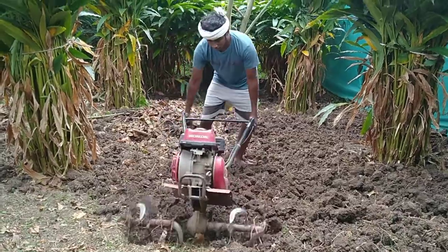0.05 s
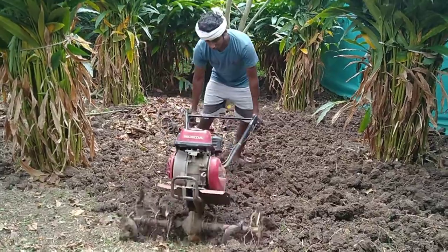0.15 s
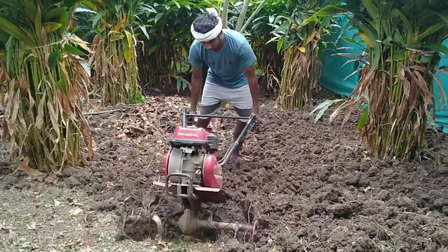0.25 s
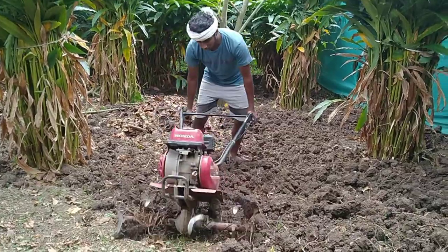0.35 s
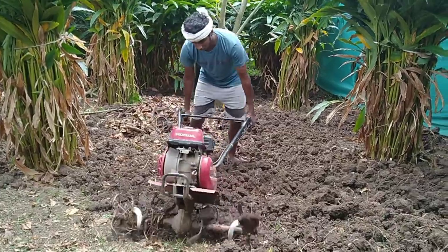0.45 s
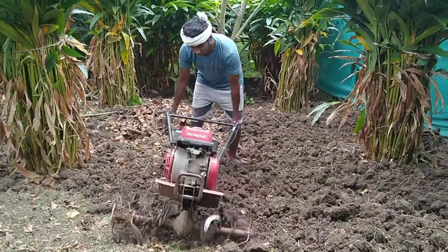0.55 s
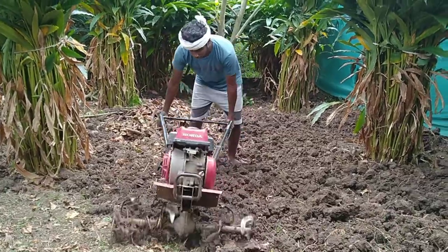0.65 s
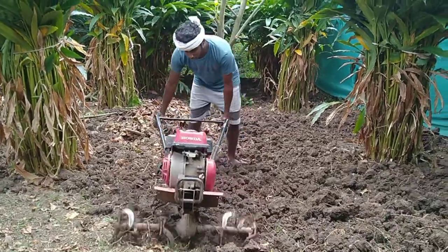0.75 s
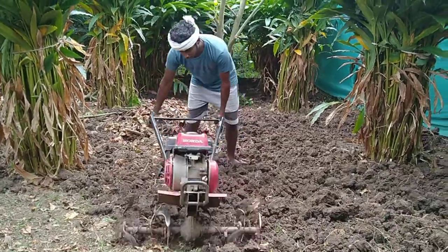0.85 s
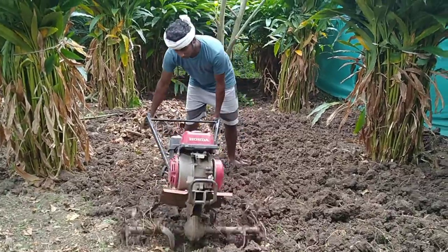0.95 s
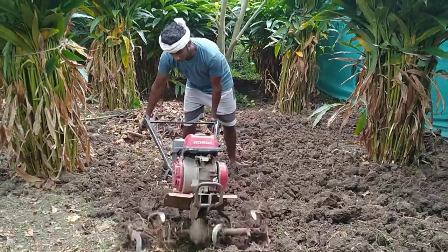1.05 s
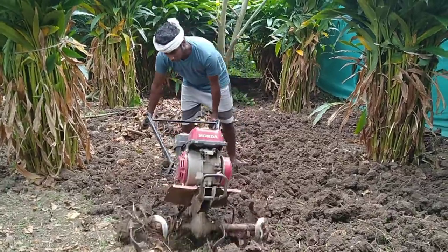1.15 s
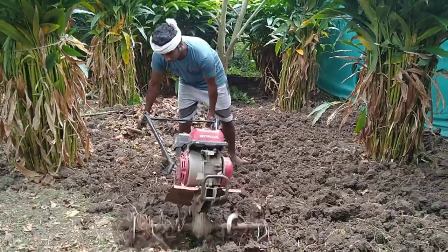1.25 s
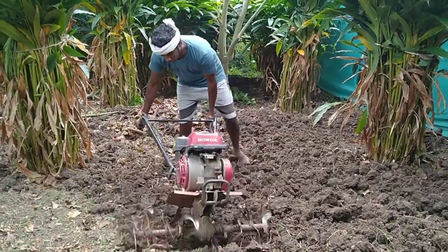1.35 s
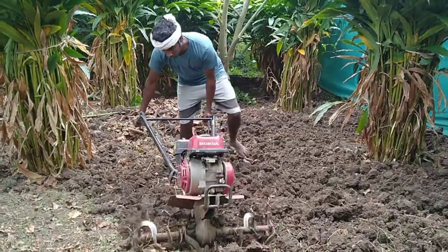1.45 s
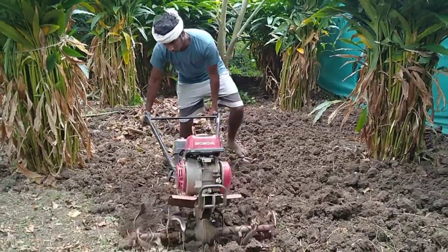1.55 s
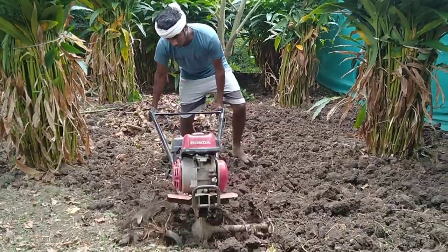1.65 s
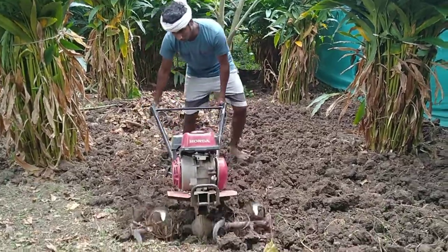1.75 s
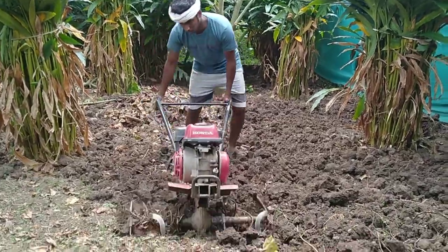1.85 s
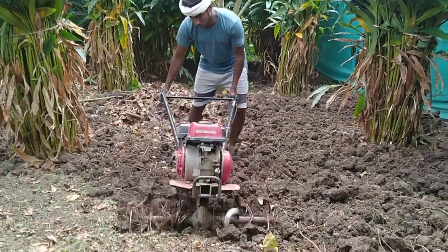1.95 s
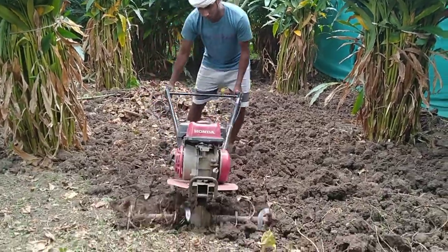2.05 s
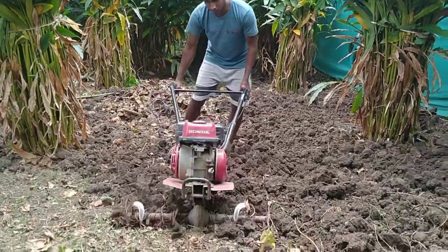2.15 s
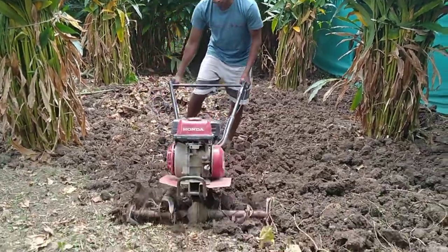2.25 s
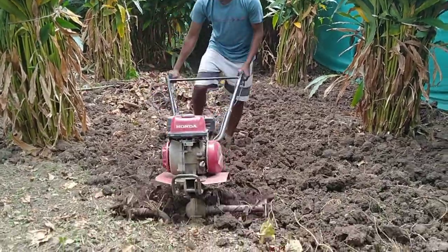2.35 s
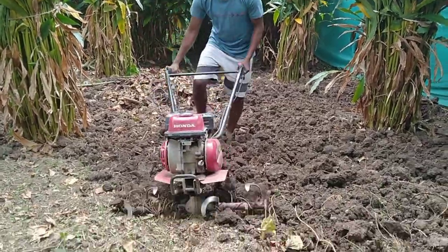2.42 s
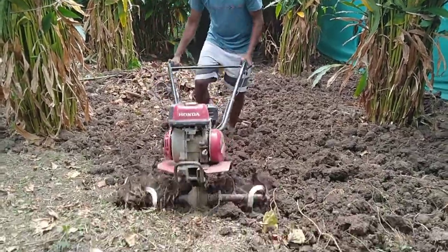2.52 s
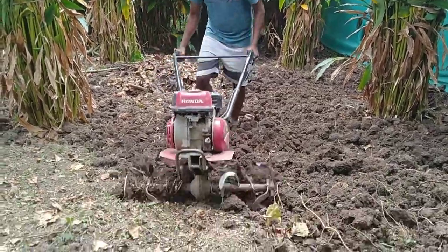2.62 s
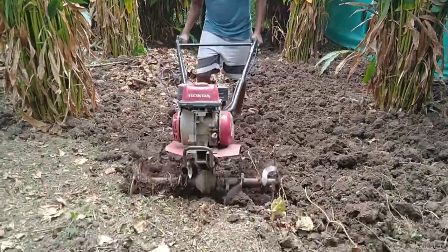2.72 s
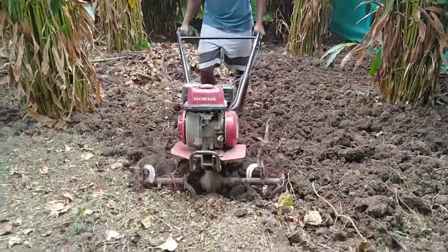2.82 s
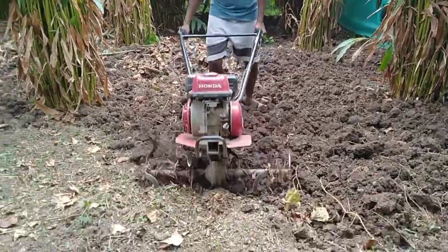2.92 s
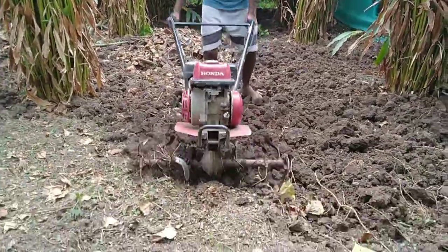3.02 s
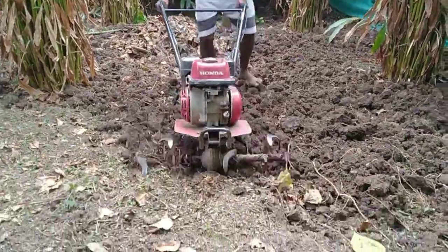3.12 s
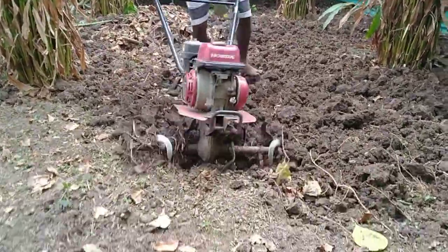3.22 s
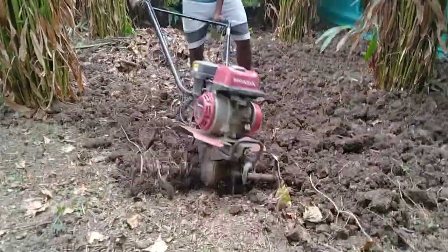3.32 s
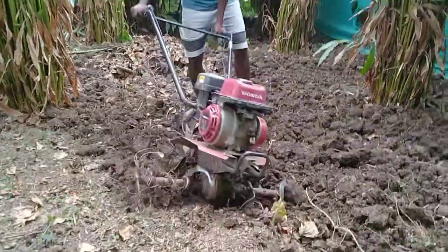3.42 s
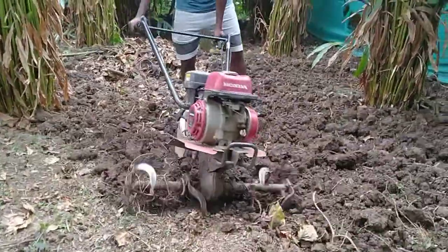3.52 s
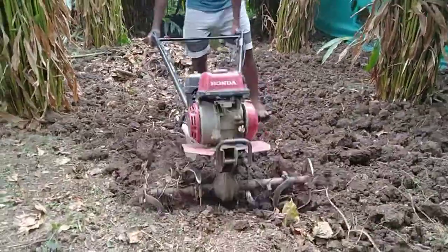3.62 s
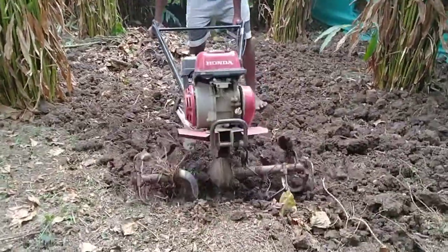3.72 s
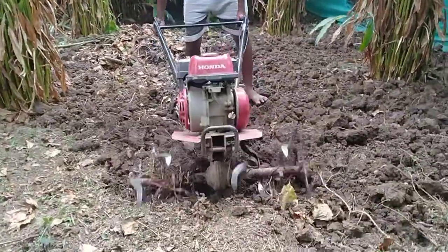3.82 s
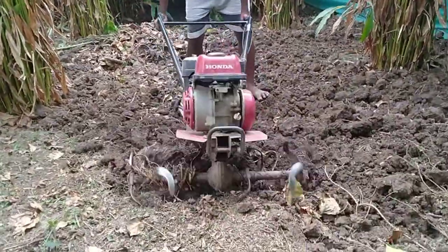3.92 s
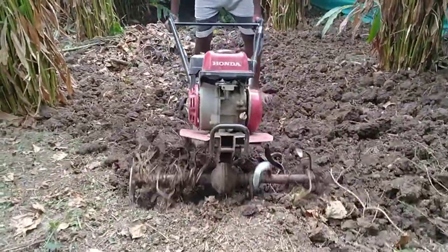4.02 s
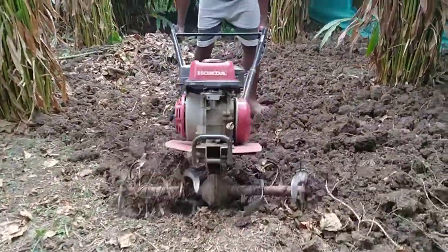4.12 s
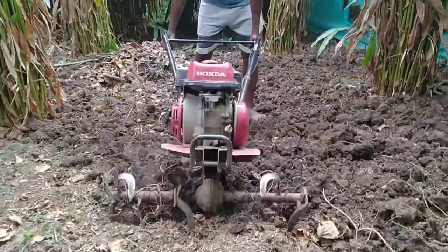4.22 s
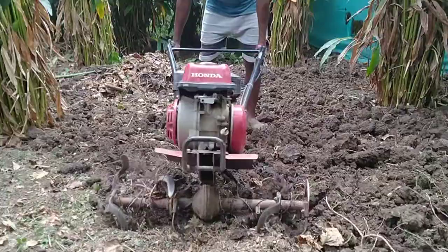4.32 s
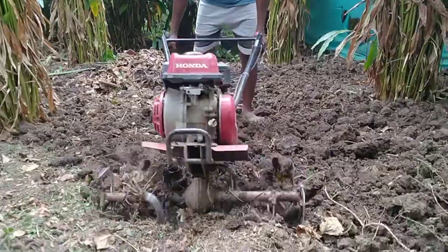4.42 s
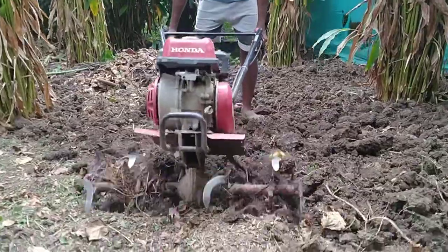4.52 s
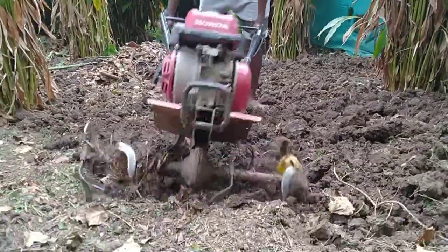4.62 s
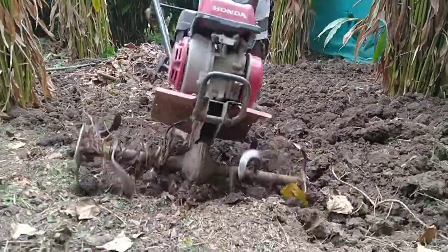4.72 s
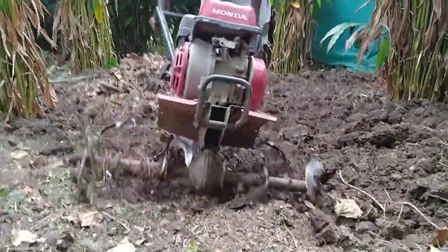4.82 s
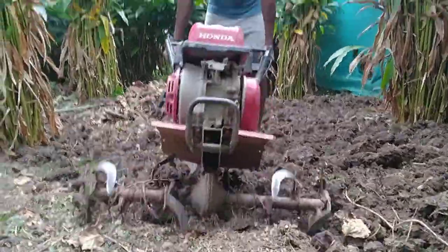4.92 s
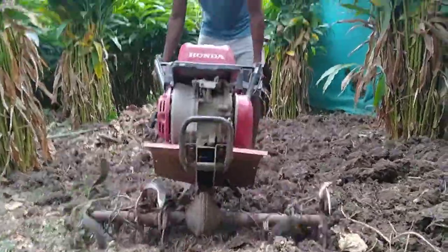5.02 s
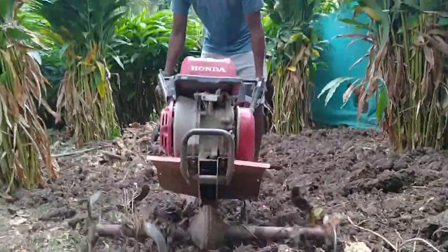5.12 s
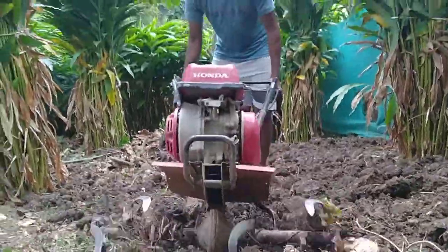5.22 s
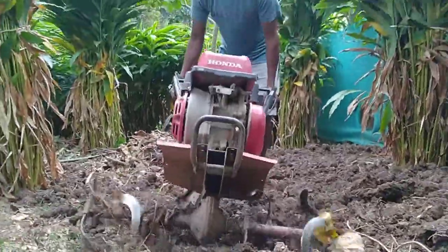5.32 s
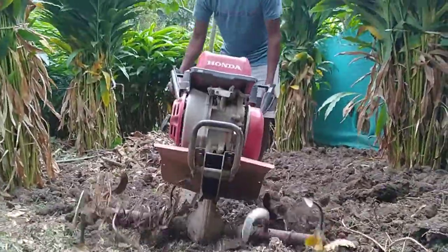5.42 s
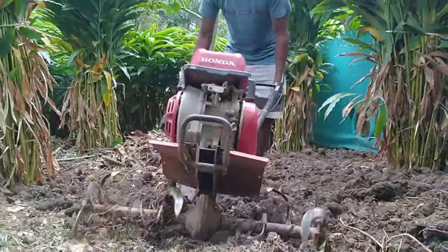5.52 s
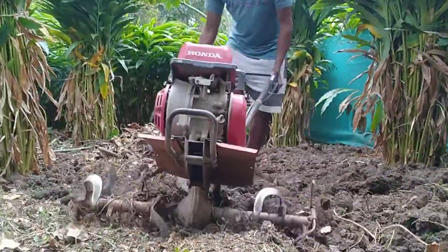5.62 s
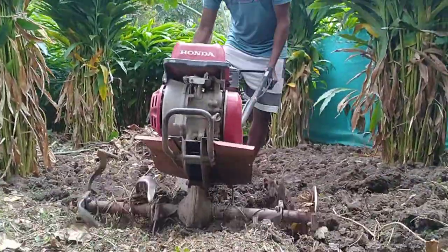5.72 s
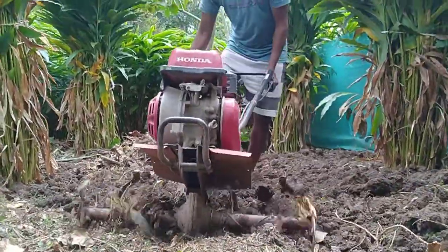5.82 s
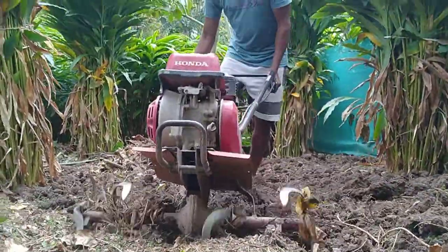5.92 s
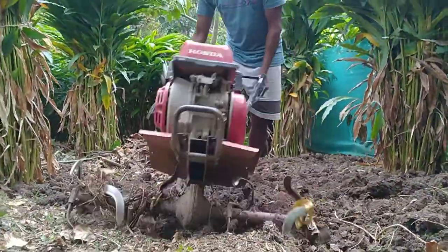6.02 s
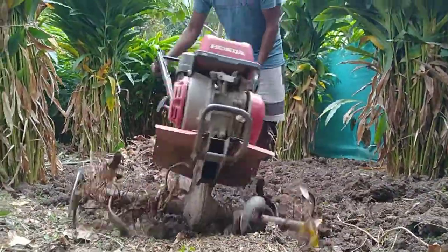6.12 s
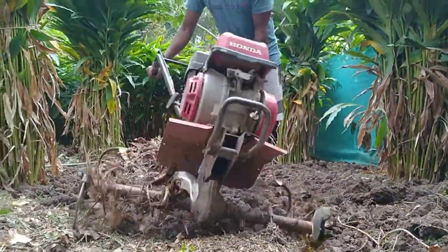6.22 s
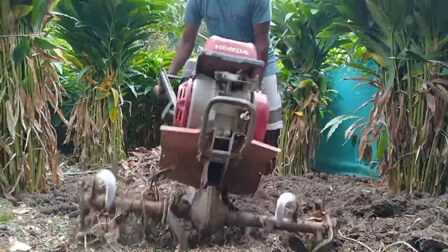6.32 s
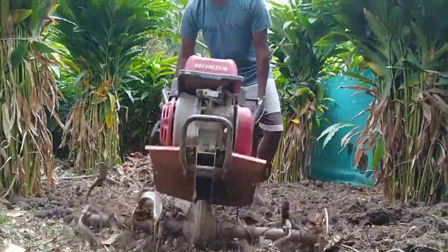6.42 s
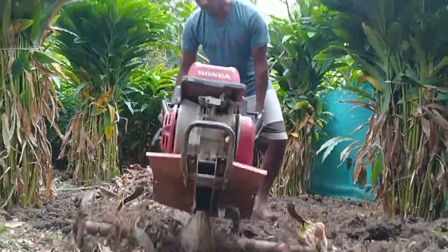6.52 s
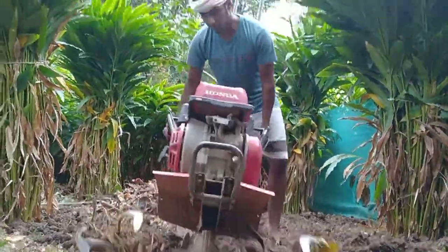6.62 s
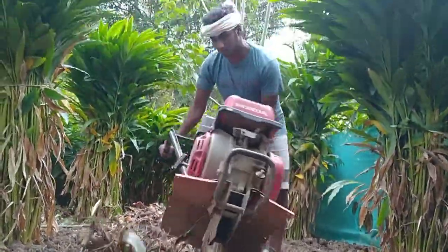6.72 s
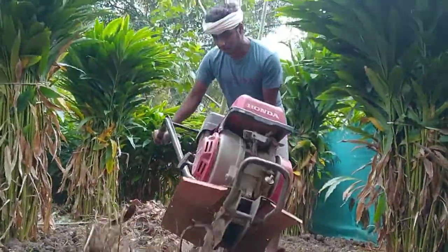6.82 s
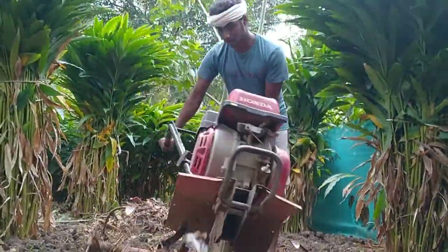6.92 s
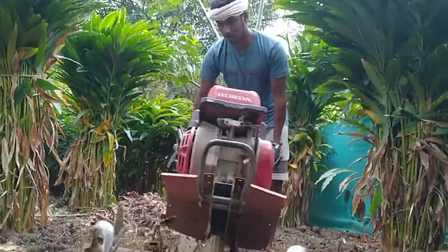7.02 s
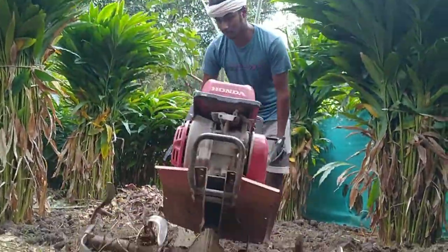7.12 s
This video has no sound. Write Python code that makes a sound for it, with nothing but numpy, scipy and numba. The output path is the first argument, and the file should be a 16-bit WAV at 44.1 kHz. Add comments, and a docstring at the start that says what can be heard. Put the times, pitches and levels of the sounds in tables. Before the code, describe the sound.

A small petrol tiller chugs and ticks steadily, working closer as its tines scrape and crumble through soil.

```python
"""Petrol tiller in a garden plot

A small four-stroke tiller digs through soil and works its way closer; one cycle count drives all engine sounds.
Each cycle gives gas puffs, exhaust bark, intake gulp and bright valve tick; casing, guard plate and cover ring.
Tines scrape and crumble the soil (filtered grains); each bite slows the engine. Twice the machine
thumps onto the ground (decaying sines). Faint low noise is the open air."""
import sys
import numpy as np
from scipy import signal
from scipy.fft import rfft, irfft, next_fast_len
from scipy.io import wavfile
from scipy.ndimage import uniform_filter1d
from numba import njit

SR = 44100
rng = np.random.default_rng(int(sys.argv[2]) if len(sys.argv) > 2 else 0)


def dump(signal):
    """Clip the signal to [-1, 1] and save it as 16-bit WAV at the path in sys.argv[1]."""
    limited = np.clip(np.atleast_2d(signal).T, -1, 1)
    pcm = np.round(limited * 32767).astype(np.int16)
    wavfile.write(sys.argv[1], SR, pcm)


N = 315315
TIME = np.arange(N) / SR
# valve openings, in cycles
EXHAUST_AT, INTAKE_AT = .02, .274


def from_db(db):
    """Decibels to gain."""
    return 10 ** (np.asarray(db) / 20)


def rms_one(x):
    """Scale to unit rms."""
    return x / np.sqrt(np.mean(x ** 2) + 1e-20)


def in_time(rows):
    """Interpolate each column over time; the first column is seconds."""
    s, *columns = np.transpose(rows)
    return [np.interp(TIME, s, c) for c in columns]


def drift(per_s):
    """Random wander with a spread of about 1, per_s new points a second."""
    return np.interp(TIME * per_s, np.arange(200), rng.standard_normal(size=200))


def swell(at_s, half_length_s):
    """Gaussian rise and fall around a moment."""
    return np.exp(-((TIME - at_s) / half_length_s) ** 2)


def colour(x, spectrum):
    """Shape a sound with a smooth spectrum; rms 1."""
    hz, db = np.transpose(spectrum)
    size = next_fast_len(N + 4096)
    bins_hz = np.maximum(np.fft.rfftfreq(size, 1 / SR), 1)
    gain = from_db(np.interp(np.log(bins_hz), np.log(hz), db))
    return rms_one(irfft(rfft(x, size) * gain, size)[:N])


def resonate(x, hz, width_hz):
    """Two-pole resonance with gain 1 at its top."""
    r = np.exp(-np.pi * width_hz / SR)
    zeros = np.array([1, 0, -1]) * (1 - r * r) / 2
    poles = [1, -2 * r * np.cos(2 * np.pi * hz / SR), r * r]
    return signal.lfilter(zeros, poles, x + 1e-18)


@njit
def moving_resonance(x, hz, width_hz):
    """Two-pole resonance with gain 1 at its top, whose centre follows a curve."""
    r = np.exp(-np.pi * width_hz / SR)
    y = np.zeros(len(x))
    for i in range(2, len(x)):
        drive = (1 - r * r) / 2 * (x[i] - x[i - 2])
        y[i] = drive + 2 * r * np.cos(2 * np.pi * hz[i] / SR) * y[i - 1] - r * r * y[i - 2] + 1e-18
    return y


def grains(per_s, spread_db):
    """Random tiny impacts of uneven size and either sign; rms 1."""
    sizes = from_db(spread_db * np.minimum(rng.exponential(1, N), 4))
    hits = rng.random(N) < per_s / SR
    return rms_one(hits * sizes * rng.choice([-1, 1], N))


def each_cycle(turn, spread_db):
    """A new random gain for every engine cycle."""
    return from_db(spread_db * rng.standard_normal(size=400))[np.floor(turn).astype(int)]


def knock(cycle, at, spread_db):
    """One click per cycle, at a point given in cycles."""
    turn = cycle - at
    clicks = np.diff(np.floor(turn), prepend=np.floor(turn[0]))
    return clicks * each_cycle(turn, spread_db)


def burst(cycle, at, rise, decay, spread_db):
    """Envelope that rises fast once per cycle and dies away (times in cycles)."""
    age = (cycle - at) % 1
    return (1 - np.exp(-age / rise)) * np.exp(-age / decay) * each_cycle(cycle - at, spread_db)


def engine_sag():
    """Firings per second lost as the tines bite and drag the engine down."""
    # Each row: centre in seconds, half length in seconds, firings per second lost.
    bites = [(0.079, 0.101, 1.312), (0.291, 0.091, 1.651), (0.619, 0.146, 2.747), (1.048, 0.154, 1.846),
             (1.223, 0.089, 2.264), (1.391, 0.09, 2.0), (1.616, 0.184, 1.94), (1.935, 0.091, 2.975),
             (2.096, 0.081, 2.581), (2.293, 0.143, 2.103), (2.632, 0.137, 2.685), (2.986, 0.103, 2.362),
             (3.282, 0.069, 3.301), (3.49, 0.113, 2.128), (3.732, 0.069, 2.319), (4.04, 0.149, 1.994),
             (4.328, 0.205, 1.859), (4.671, 0.105, 2.889), (4.86, 0.094, 1.414), (5.084, 0.138, 1.375),
             (5.36, 0.105, 2.629), (5.538, 0.09, 1.77), (5.762, 0.16, 1.404), (6.077, 0.109, 2.77),
             (6.259, 0.074, 1.593), (6.514, 0.079, 2.371), (6.733, 0.084, 2.823), (6.979, 0.124, 3.067)]
    return sum(lost * swell(s, half_s) for s, half_s, lost in bites)


def engine_cycle(sag):
    """Running count of engine cycles, one firing each; one firing comes late."""
    free_firings_per_s, first_firing_cycles = 31.8, .709
    # Late firing: start in seconds, length in seconds, cycles lost.
    stumble = (4.39, .025, .28)
    s, length_s, lost = stumble
    late = lost * np.clip((TIME - s) / length_s, 0, 1)
    return np.cumsum(free_firings_per_s - sag) / SR - first_firing_cycles - late


def puffs(cycle, spread_db):
    """A slug of gas radiates the slope of its flow: one push and one pull."""
    # Gas slugs of one cycle. Each row: start in cycles, length in cycles, front steepness exponent,
    # relative strength (negative sucks).
    slugs = [(.007, .172, .8, .95), (.223, .2, .97, -.43), (.568, .148, 1.02, .35)]
    out = 0
    for start, length, steep, strength in slugs:
        progress = np.minimum((cycle - start) % 1 / length, 1)
        slope = np.sin(2 * np.pi * progress ** steep)
        out = out + strength * slope * each_cycle(cycle - start, spread_db)
    return rms_one(out)


def bark(cycle):
    """The exhaust valve cracks open with a short, dry bark; burning gas spits in its wake."""
    # Each row: time in seconds, level in dB.
    level = [(0, -51.5), (1, -43), (3.15, -43), (4.1, -38), (4.75, -44), (5.5, -39.5), (7.15, -41)]
    bark_hz, pass_width_hz, spit_gain = 573, 680, .012
    bark_db, = in_time(level)
    spit = grains(per_s=3000, spread_db=2.0) * burst(cycle, EXHAUST_AT, .005, .07, spread_db=3.0)
    crack = knock(cycle, EXHAUST_AT, spread_db=2.5) + spit_gain * spit
    for _ in range(2):
        crack = resonate(crack, bark_hz, pass_width_hz)
    return from_db(bark_db) * rms_one(crack)


def drumming(cycle):
    """Both gas strokes drum on two close resonances of the machine's body."""
    # Each row: time in seconds, level in dB.
    level = [(0, -56), (1.9, -48), (2.4, -42.5), (3.2, -41.5), (4.1, -39), (4.5, -46), (5.2, -41),
             (7.15, -38)]
    drum_db, = in_time(level)
    kick = 0.19 * knock(cycle, INTAKE_AT, spread_db=-0.5) + knock(cycle, EXHAUST_AT, spread_db=0.5)
    return from_db(drum_db) * rms_one(resonate(resonate(kick, 432, 106), 442.7, 37))


def air_box(cycle, rough):
    """The intake gulp, a click with some turbulence, sets the air box booming briefly."""
    # Each row: time in seconds, level in dB, centre in Hz.
    boom = [(0, -44, 550), (1, -39, 580), (1.8, -47.5, 543), (3.15, -42.5, 494), (4.1, -44, 470),
            (4.75, -38, 390), (5.5, -36, 380), (7.15, -35, 423)]
    pass_width_hz = 366.0
    box_db, box_hz = in_time(boom)
    rush = rng.standard_normal(N) * burst(cycle, INTAKE_AT, 0.022, 0.2, spread_db=1.5)
    gulp = knock(cycle, INTAKE_AT, spread_db=1.2) + rough * rush
    for _ in range(2):
        gulp = moving_resonance(gulp, box_hz, pass_width_hz)
    return -from_db(box_db) * rms_one(gulp)


def silencer(cycle, rough):
    """Each valve opening kicks the pipe resonances and sends a little turbulence through them."""
    # Each row: time in seconds, main note in dB, main note in Hz, upper resonances in dB.
    ringing = [(0, -41.5, 536, -51), (1.3, -40, 539, -48), (2.7, -40.5, 535, -42), (3.05, -38, 553, -41),
               (3.5, -38.5, 557, -41), (4.1, -37, 540, -42), (4.75, -42.5, 535, -49),
               (5.5, -37.5, 551, -59), (7.15, -34.5, 568, -48)]
    # Upper resonances. Each row: centre in Hz, width in Hz, drive in dB from exhaust, from intake.
    pipes = [(630, 27, -5, 8.5), (774, 37, -19, 2.5), (917, 56, -20, -2), (1580, 39, 2, 0)]
    note_width_hz = 52.0
    note_db, note_hz, upper_db = in_time(ringing)
    exhaust_rush = rng.standard_normal(N) * burst(cycle, EXHAUST_AT, 0.008, 0.15, spread_db=6.0)
    exhaust = knock(cycle, EXHAUST_AT, spread_db=4.5) + rough * exhaust_rush
    intake_rush = rng.standard_normal(N) * burst(cycle, INTAKE_AT, 0.03, 0.11, spread_db=2.5)
    intake = knock(cycle, INTAKE_AT, spread_db=1.0) + rough * intake_rush
    note = moving_resonance(intake, note_hz, note_width_hz)
    upper = 0
    for hz, width_hz, exhaust_db, intake_db in pipes:
        drive = from_db(exhaust_db) * exhaust + from_db(intake_db) * intake
        upper = upper + resonate(drive, hz, width_hz)
    return from_db(note_db) * rms_one(note) + from_db(upper_db) * rms_one(upper)


def gas_flow(cycle, sag, near_db):
    """Puffs grow with nearness and engine sag; the other gas sounds follow their own level curves."""
    mean_puff_db, puff_db_per_sag = -29.5, 0.82
    puff_db = mean_puff_db + near_db + puff_db_per_sag * (sag - sag.mean())
    out = from_db(puff_db) * puffs(cycle, spread_db=.4)
    return out + bark(cycle) + drumming(cycle) + air_box(cycle, rough=0.015) + silencer(cycle, rough=0.024)


def casing(cycle):
    """Piston and valve train knock on the casing, the gears rattle and the cooling fan whirrs."""
    # Blows in one cycle. Each row: point in cycles, relative level in dB.
    blows = [(.01, -2), (0.246, 1.5), (.305, -0.5), (0.421, -0.5), (0.5, -4), (.72, -2), (.86, 0)]
    # Casing modes. Each row: centre in Hz, width in Hz, relative level in dB.
    modes = [(1334, 79, -1.5), (1560, 23, -30), (1971, 96, 2), (2140, 80, 1.5), (2500, 53, 6.5),
             (2656, 88, 3), (2886, 51, 2), (3165, 67, 0), (3477, 56, -0.5), (3830, 57, -0.5),
             (4150, 33, 3.5), (4350, 27, -11)]
    # Fan spectrum. Each row: frequency in Hz, density in dB per Hz.
    whirr_spectrum = [(300, -8), (430, -22), (560, -4), (750, -2.5), (1100, -4), (1600, -1.5), (2700, -0.5),
                      (3400, -4), (4400, -2.5), (5200, -11), (7000, -16.5), (7900, -15), (9200, -14),
                      (16000, -7)]
    mode_drift_db = 4.5  # casing modes swell and fade slowly, each at random
    knocks = rms_one(sum(from_db(db) * knock(cycle, at, spread_db=1.5) for at, db in blows))
    rattle = burst(cycle, 0.28, .02, 0.19, spread_db=2.0)
    shake = knocks + rng.standard_normal(N) * (0.94 + rattle)
    rings = 0
    for hz, width_hz, db in modes:
        rings = rings + from_db(db + mode_drift_db * drift(per_s=2.05)) * resonate(shake, hz, width_hz)
    surge = burst(cycle, 0.19, .02, 0.14, spread_db=4.0)
    whirr = colour(rng.standard_normal(N) * (1.5 + .5 * surge), whirr_spectrum)
    return from_db(-2.5) * rms_one(rings) + from_db(3.0) * whirr


def sizzle(cycle):
    """A bright rush of grains follows each tick and fades through the cycle."""
    # Each row: frequency in Hz, density in dB per Hz.
    spectrum = [(450, -40), (1500, 4), (3500, -11), (5500, -1.5), (7800, 1.5), (9500, -1), (11000, 4.5),
                (12400, 4), (13500, 7.5), (14800, -1), (16000, 5)]
    envelope = burst(cycle, 0.234, 0.019, 0.46, spread_db=2.0) + 0.11
    return colour(grains(per_s=27000, spread_db=-3.0) * envelope, spectrum)


def valve_tick(cycle):
    """The valve lands with a sharp tick, bounces once and rings its thin cover."""
    # Tick spectrum. Each row: frequency in Hz, density in dB per Hz.
    spectrum = [(450, -35), (1500, -3.5), (3500, 5.5), (5500, -45), (7800, 1.5), (9500, -28), (11300, -28),
                (12400, 11.5), (13500, 4.5), (14800, 11.5), (16000, -11)]
    # Cover modes. Each row: centre in Hz, width in Hz, relative level in dB.
    modes = [(12100, 90, -5), (13700, 53, -15), (14700, 560, 7), (14700, 140, 0)]
    ring_db, mode_drift_db = -17, 2
    landing = burst(cycle, .245, .004, 0.085, spread_db=0.8)
    bounce = .5 * burst(cycle, 0.345, .005, .035, spread_db=2.0)
    contact = landing + bounce
    strike = rng.standard_normal(N) * contact
    rings = 0
    for hz, width_hz, db in modes:
        rings = rings + from_db(db + mode_drift_db * drift(per_s=2.14)) * resonate(strike, hz, width_hz)
    return colour(rng.standard_normal(N), spectrum) * contact + from_db(ring_db) * rms_one(rings)


def mechanics(cycle, sag):
    """The tick softens when the engine is dragged down, the sizzle a little; clatter hardly changes."""
    # Clatter. Each row: time in seconds, level in dB.
    clatter_level = [(0, -43), (.5, -39), (1.8, -38), (3, -35), (3.35, -35), (3.75, -35), (4.2, -34.5),
                     (4.7, -33), (5.3, -34), (5.7, -32.5), (6.1, -34), (6.65, -34.5), (7.15, -35.5)]
    # Tick with the engine running free. Each row: time in seconds, level in dB.
    tick_level = [(0, -28.5), (1.0, -28), (1.6, -27), (2.1, -26.5), (2.6, -26.5), (3.4, -25.5), (3.8, -25),
                  (4.2, -26), (4.5, -22.5), (4.75, -26), (5.2, -25), (5.5, -23), (5.65, -19), (5.98, -21),
                  (6.2, -20.5), (6.4, -25), (7.15, -20)]
    clatter_db_per_sag, casing_over_clatter_db, sizzle_over_clatter_db = -0.05, -0.1, 1.5
    # beyond this sag, in firings per second lost, the valve lands softly
    soft_tick_sag, tick_db_per_sag = 2.5, -7.5
    sizzle_db_per_tick_db = .3
    clatter_db, = in_time(clatter_level)
    tick_db, = in_time(tick_level)
    clatter_db = clatter_db + clatter_db_per_sag * (sag - sag.mean())
    tick_db = tick_db + tick_db_per_sag * np.maximum(sag - soft_tick_sag, 0)
    sizzle_db = clatter_db + sizzle_over_clatter_db + sizzle_db_per_tick_db * (tick_db - tick_db.mean())
    out = from_db(clatter_db + casing_over_clatter_db) * casing(cycle)
    out += from_db(sizzle_db) * sizzle(cycle)
    return out + from_db(tick_db) * valve_tick(cycle)


def buzzing_ring(cycle, hz, width_hz, at, rough):
    """Clicks once per cycle and rough noise ring on one narrow note, at an even strength."""
    scrub = rng.standard_normal(N) * (0.91 + burst(cycle, at, 0.12, 0.037, spread_db=3.0))
    taps = knock(cycle, at, spread_db=-0.5) + rough * scrub
    note_hz = hz * np.ones(N)
    ring = moving_resonance(taps, note_hz, float(width_hz))
    ring = moving_resonance(ring, note_hz, 2.4 * width_hz)
    return ring / np.sqrt(np.abs(uniform_filter1d(ring ** 2, size=3000)) + 1e-20)


def metal_rings(cycle, sag, near_db):
    """Guard plate rings harder and lower as the engine labours; cover rings high; a lower ring wanders in pitch."""
    # Loud guard buzzes. Each row: centre in seconds, half length in seconds, level in dB.
    buzzes = [(0.6, 0.044, -43), (1.393, 0.063, -42), (1.644, 0.096, -43), (2.024, 0.023, -43),
              (2.272, 0.046, -42), (2.96, 0.068, -36), (4.07, 0.11, -42), (5.43, 0.06, -39),
              (6.03, 0.037, -41), (6.23, 0.051, -40), (6.906, 0.025, -37)]
    # Cover's high note. Each row: time in seconds, level in dB, note in Hz.
    cover_note = [(0, -56, 2390), (.45, -48, 2360), (.9, -39, 2407), (1.65, -42, 2375), (2.1, -47, 2340),
                  (2.9, -45.5, 2340), (3.4, -52, 2360), (4.5, -41.5, 2370), (5, -41, 2320),
                  (7.15, -42, 2361)]
    # Second, lower ring. Each row: time in seconds, level in dB, note in Hz.
    low_note = [(0, -47, 1235), (.9, -43.5, 1248), (2.9, -44, 1200), (3.4, -45, 1293), (4.1, -40, 1377),
                (5.1, -42, 1370), (5.55, -40, 1267), (5.95, -37.5, 1375), (6.25, -42, 1298),
                (7.15, -44, 1366)]
    guard_db, guard_db_per_near_db, guard_db_per_sag = -48.5, 0.55, 3
    free_guard_hz, guard_hz_per_sag, guard_wander_hz = 1859, -11, 5
    guard = from_db(guard_db + guard_db_per_near_db * near_db + guard_db_per_sag * sag)
    guard = guard + sum(from_db(db) * swell(s, half_s) for s, half_s, db in buzzes)
    cover_db, cover_hz = in_time(cover_note)
    low_db, low_hz = in_time(low_note)
    cover = from_db(cover_db) * buzzing_ring(cycle, hz=cover_hz, width_hz=58, at=.37, rough=0.018)
    low_ring = from_db(low_db) * buzzing_ring(cycle, hz=low_hz, width_hz=48, at=.3, rough=0.037)
    guard_hz = free_guard_hz + guard_hz_per_sag * sag + guard_wander_hz * drift(per_s=9)
    guard_ring = guard * buzzing_ring(cycle, hz=guard_hz, width_hz=26.0, at=0.25, rough=0.075)
    return guard_ring + cover + low_ring


def rumble():
    """Moving air rumbles faintly: low coloured noise."""
    # Each row: frequency in Hz, density in dB per Hz.
    spectrum = [(20, -8), (60, -34), (100, -6), (160, -20), (300, -8), (800, -30)]
    return from_db(-47) * colour(rng.standard_normal(N), spectrum)


def scrape():
    """Steel scrapes through earth: a band of grit whose centre moves as the machine pitches and digs in."""
    # Each row: time in seconds, level in dB before a 3 dB cut, centre in Hz.
    course = [(0, -43.5, 1235), (1, -38.5, 1253), (2.7, -35, 1282), (3.4, -39.5, 1153), (3.8, -40, 920),
              (4.25, -45, 853), (4.48, -29.5, 1155), (4.7, -29.5, 1206), (5.15, -29.5, 1436),
              (5.8, -42.5, 1339), (7.15, -43, 1196)]
    scrape_db, scrape_hz = in_time(course)
    lowpass = signal.butter(2, 215, fs=SR, output="sos")
    grit = rms_one(signal.sosfilt(lowpass, grains(per_s=5000, spread_db=3.0)))
    carrier = np.cos(2 * np.pi * np.cumsum(scrape_hz) / SR)
    return from_db(scrape_db - 3.0) * rms_one(grit * carrier)


def crumbs():
    """Crumbling soil rains down as dense, uneven grains."""
    # Each row: time in seconds, level in dB.
    level = [(0, -44.5), (.6, -40.5), (2.3, -40), (3, -37), (3.8, -36), (4.7, -32), (5.6, -37),
             (6.5, -29.5), (7.15, -30.5)]
    # Each row: frequency in Hz, density in dB per Hz.
    spectrum = [(400, -7), (720, 10.5), (1500, 8.5), (4000, -4), (5400, -3.5), (7000, 1), (7900, 11),
                (8900, -2.5), (10000, -15.5), (16000, 1.5)]
    crumb_db, = in_time(level)
    return from_db(crumb_db) * colour(grains(per_s=14000, spread_db=5.5), spectrum)


def churn():
    """Heavy earth churns dully: sparser grains with a low spectrum."""
    # Each row: time in seconds, level in dB.
    level = [(0, -73), (4.1, -55), (4.6, -41), (4.95, -41), (5.8, -39), (6.2, -40), (7.15, -37.5)]
    # Each row: frequency in Hz, density in dB per Hz.
    spectrum = [(40, -10), (120, -12), (300, 1.5), (500, -9), (1000, -51), (3000, -50)]
    churn_db, = in_time(level)
    return from_db(churn_db) * colour(grains(per_s=560, spread_db=3.0), spectrum)


def clods():
    """Struck clods and small stones burst in short sprays of band-limited grit."""
    # Each row: start in seconds, decay in seconds, level in dB, centre in Hz.
    strikes = [(3.305, 0.086, -36, 3000), (3.72, 0.017, -27, 11000), (4.35, .012, -39, 13000),
               (4.46, .015, -32, 7000), (4.514, 0.018, -30, 13110), (4.635, 0.049, -27.5, 4500),
               (4.693, 0.024, -23, 1232), (4.729, 0.019, -24.5, 2600), (5.22, 0.18, -32, 2000),
               (6.42, .08, -33.5, 2576), (6.445, 0.071, -30.5, 7800), (6.52, 0.016, -22, 5000)]
    rise_s, width_per_hz = 0.0011, 1.0
    out = 0
    for s, decay_s, db, hz in strikes:
        age_s = np.maximum(TIME - s, 0)
        grit = rms_one(resonate(grains(per_s=7000, spread_db=5.0), hz, width_per_hz * hz))
        envelope = (1 - np.exp(-age_s / rise_s)) * np.exp(-age_s / decay_s)
        out = out + from_db(db) * envelope * grit
    return out


def tine_rings():
    """Grit rubs a steel tine into a short, rough note as it drags over stones."""
    # Each row: centre in seconds, half length in seconds, level in dB, note in Hz.
    notes = [(4.583, .1, -41, 2450), (5.333, .14, -37, 2540), (6.221, 0.088, -40, 2700),
             (6.642, .07, -34, 2270), (6.678, 0.053, -35, 2630), (7.06, 0.055, -40, 2330)]
    width_hz = 91
    out = 0
    for s, half_s, db, hz in notes:
        rub = resonate(grains(per_s=3800, spread_db=0.0), hz, width_hz)
        out = out + from_db(db) * swell(s, half_s) * rms_one(resonate(rub, hz, 2 * width_hz))
    return out


def tines():
    """All sounds of steel in soil."""
    return scrape() + crumbs() + churn() + clods() + tine_rings()


def thumps():
    """The machine drops heavily onto the ground: dull, quickly damped sines."""
    # Each row: start in seconds, level in dB ahead of the envelope.
    drops = [(6.473, -21), (6.89, -17)]
    thump_hz, rise_s, decay_s = 112, 0.011, 0.016
    out = 0
    for s, db in drops:
        age_s = np.maximum(TIME - s, 0)
        envelope = (1 - np.exp(-age_s / rise_s)) * np.exp(-age_s / decay_s)
        out = out + from_db(db) * np.sin(2 * np.pi * thump_hz * age_s) * envelope
    return out


def scene():
    """One crankshaft drives every engine sound; soil, ground and air are added."""
    # Approach, as exhaust level; only its swing about the mean is used.
    # Each row: time in seconds, level in dB.
    approach = [(0.05, -37), (0.35, -34.5), (1.0, -33), (1.8, -32), (2.55, -31), (3.2, -31.5), (3.6, -31),
                (4.16, -30.5), (4.72, -27.5), (5.5, -27), (7.15, -27)]
    sag = engine_sag()
    cycle = engine_cycle(sag)
    exhaust_db, = in_time(approach)
    near_db = exhaust_db - exhaust_db.mean()
    engine = gas_flow(cycle, sag, near_db) + mechanics(cycle, sag) + metal_rings(cycle, sag, near_db)
    return (engine + rumble() + tines() + thumps())[None]


def record(dry):
    """Steep elliptic low-pass at the top of the treble."""
    cutoff_hz = 15900
    return signal.sosfilt(signal.ellip(12, .1, 80, cutoff_hz, fs=SR, output="sos"), dry)


dry = scene()
out = record(dry)
dump(out)
```